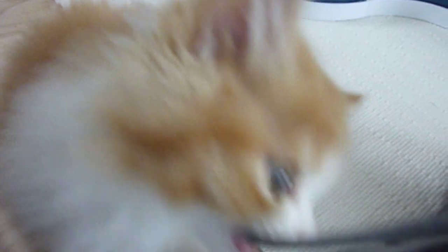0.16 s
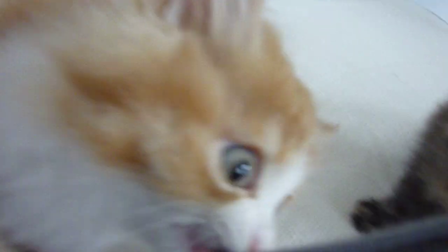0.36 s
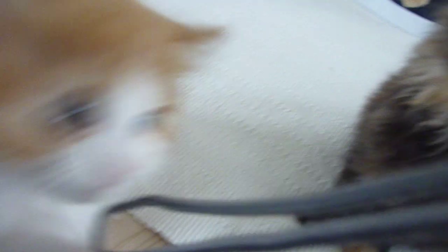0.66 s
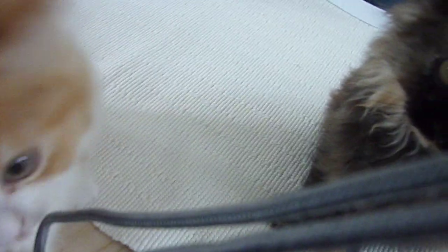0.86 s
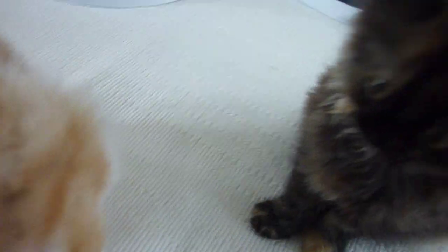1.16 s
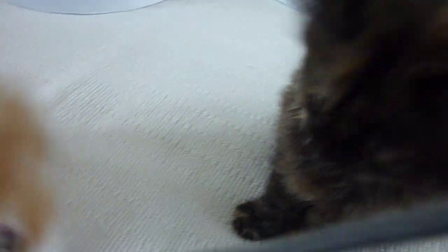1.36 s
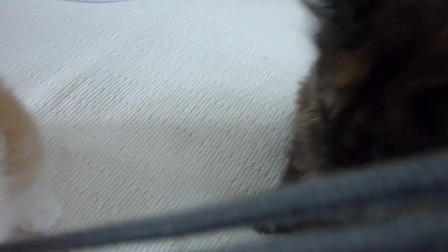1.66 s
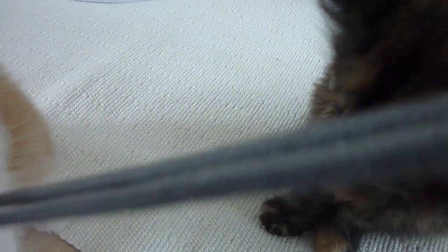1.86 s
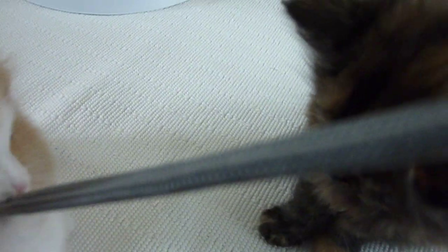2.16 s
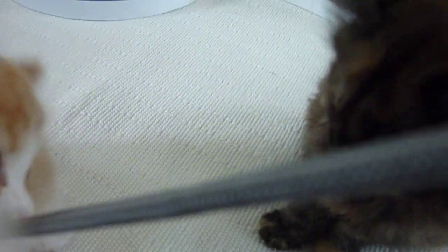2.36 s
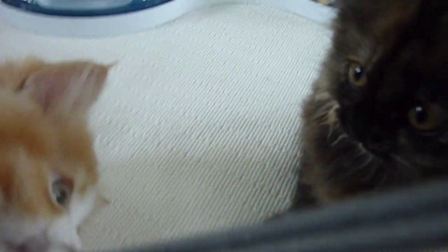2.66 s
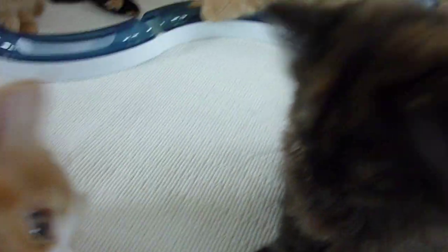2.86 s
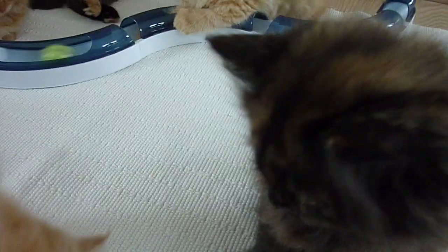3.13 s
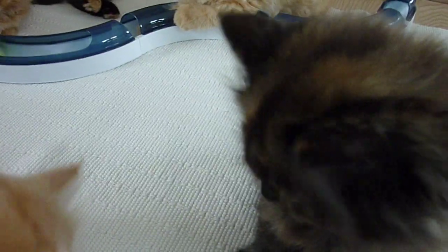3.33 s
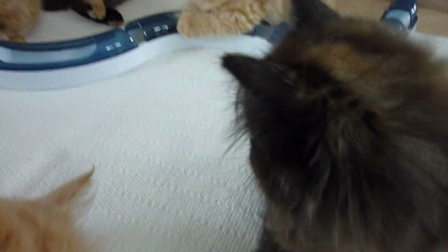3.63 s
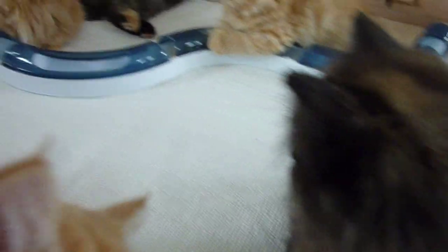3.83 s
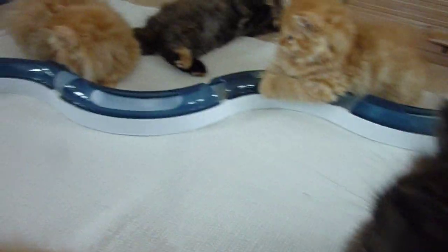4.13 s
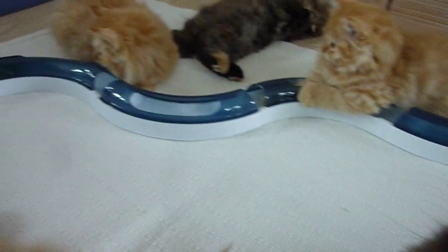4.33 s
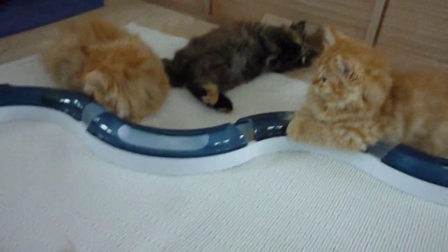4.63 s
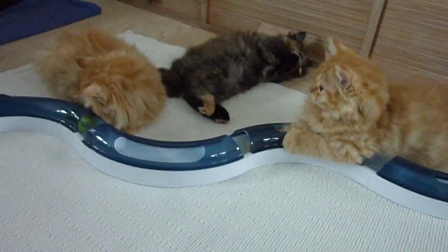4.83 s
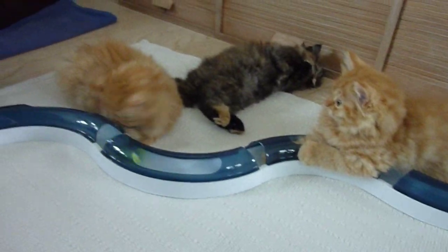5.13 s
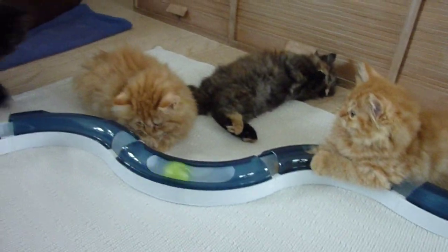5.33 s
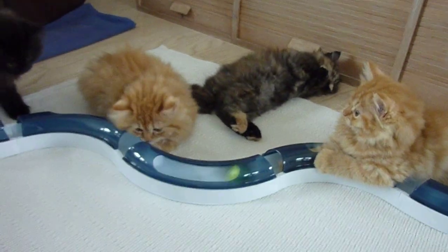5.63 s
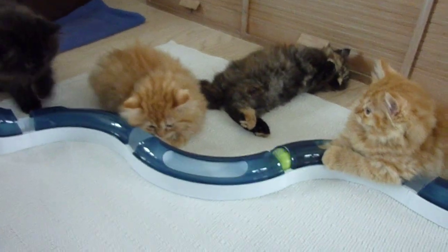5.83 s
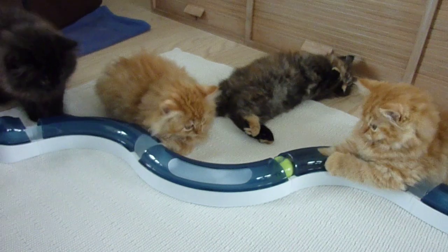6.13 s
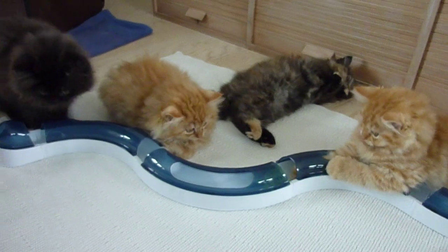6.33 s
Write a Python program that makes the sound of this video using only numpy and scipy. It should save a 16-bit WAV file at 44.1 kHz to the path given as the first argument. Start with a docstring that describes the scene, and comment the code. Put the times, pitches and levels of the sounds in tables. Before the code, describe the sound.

In a quiet room, a kitten swipes a ball along a plastic tube; it rattles over joints and fades after small strap snaps nearby.

```python
"""A ball, swiped by a kitten, rolls away down a hollow plastic track in a quiet room, clacking over the joints.
Struck and rubbed plastic is noise and impulses rung through the track's modes; paws tap, scuff and scrape.
Right at the microphone a camera strap, chewed and tugged by another kitten, clicks against the case and rubs.
Air noise, hiss and mains hum lie under it; the small camera cuts narrow notches and the top of the treble."""
import sys
import numpy as np
from scipy import signal
from scipy.fft import rfft, irfft, next_fast_len
from scipy.io import wavfile
from scipy.ndimage import uniform_filter1d, map_coordinates

SR = 44100
rng = np.random.default_rng(int(sys.argv[2]) if len(sys.argv) > 2 else 0)


def master(y):
    """Save y as 16-bit WAV."""
    cut = np.clip(np.atleast_2d(y).T, -1, 1)
    pcm = np.round(cut * 32767)  # scale
    wavfile.write(sys.argv[1], SR, pcm.astype(np.int16))


N = 286275

# how strongly the ball rolls on its way down the track: t/s, level/dB
ROLL_STRENGTH = [(2.78, -60), (2.94, -45.5), (3.12, -46.5), (3.23, -41.5), (3.52, -47.5), (3.9, -45.5),
                 (4.09, -49.5), (4.22, -46.5), (4.6, -52), (4.95, -54), (5.35, -51), (5.71, -54),
                 (5.9, -58)]
# rolling strength at which the parts of the rolling sound have their stated levels
FULL_ROLL_DB = -45.5
# spectrum of hard surfaces scraping, before scaling to rms 1: f/Hz, level/dB per Hz
SCRAPE_SPECTRUM = [(1500, -45), (3000, 1.5), (4000, 0), (5300, -6.5), (6500, -1.5), (7500, -3.5),
                   (9000, -11)]


def amp(db):
    """Decibels to gain."""
    return 10 ** (np.asarray(db) / 20)


def unit(x):
    """Scale to rms 1."""
    return x / np.sqrt(np.mean(x ** 2) + 1e-20)


def crest(x):
    """Scale so that the loudest 3 ms have rms 1."""
    power = uniform_filter1d(x ** 2, size=132, mode="constant")
    return x / np.sqrt(power.max() + 1e-20)


def along(points, hz):
    """Interpolate (Hz, value) points on a log frequency axis."""
    f, v = np.transpose(points)
    return np.interp(np.log(hz + 1), np.log(f), v)


def wobble(rate):
    """A smooth random curve with rate knots a second."""
    knots = rng.standard_normal(int(N * rate / SR) + 4)
    return map_coordinates(knots, [np.arange(N) * rate / SR])


def swell(peak_s, rise_s, fall_s):
    """Gain that climbs 20 dB in rise_s to its peak and drops 20 dB in each fall_s (for positive times)."""
    t = np.arange(N) / SR - peak_s
    return amp(-20 * np.maximum(-t / rise_s, t / fall_s))


def add(out, s, sound):
    """Mix a sound in at time s."""
    part = out[round(s * SR):][:len(sound)]
    part += sound[:len(part)]


def filtered(x, response):
    """Filter x by a complex response of frequency."""
    m = next_fast_len(len(x) + 4096)
    spectrum = rfft(x, m) * response(np.fft.rfftfreq(m, 1 / SR))
    return irfft(spectrum, m)[:len(x)]


def coloured(x, spectrum):
    """Shape x by the given spectrum and scale it to rms 1."""
    return unit(filtered(x, lambda f: amp(along(spectrum, f))))


def resonance(f, hz, width):
    """Causal response of one damped mode, of gain 1 at its centre."""
    return 1j * f * width / (hz * hz - f * f + 1j * f * width)


def soft(f, edge_hz):
    """A contact of finite length excites little above its edge: a low-pass."""
    return signal.freqs(*signal.butter(N=4, Wn=1, analog=True), f / edge_hz)[1]


def band(f, edges):
    """Causal band-pass that picks out one group of modes."""
    lo, hi = edges
    lowpass_f = (f * f - lo * hi) / ((f + 1) * (hi - lo))
    return signal.freqs(*signal.butter(N=2, Wn=1, analog=True), lowpass_f)[1]


def grains(rate, spread_db):
    """Tiny random contacts, rate a second on average, of either sign and uneven size."""
    struck = rng.random(N) < rate / SR
    sign = rng.choice([-1, 1], N)
    return struck * sign * amp(spread_db * np.clip(rng.standard_normal(N), -2, 2))


def blow(t, chatter, t60):
    """One impulse followed by dying chatter, whose size is relative to the impulse."""
    tail = rng.standard_normal(len(t)) * amp(-60 * t / t60) * (1 - np.exp(-t / 0.0024))
    return (t == 0) + chatter * tail / np.linalg.norm(tail)


def track(f, stretch=1):
    """Response of the hollow plastic tube: modes of alternating sign, all shifted by stretch."""
    # modes of the tube: f/Hz, width/Hz, level/dB
    tube_modes = [(186, 150, -8.5), (399, 125, -1), (660, 118, 2), (1023, 440, 0.5), (1362, 313, 3),
                  (1515, 194, 2.5), (2142, 440, -3)]
    response = 0
    for k, (hz, width, db) in enumerate(tube_modes):
        response = response + (-1) ** k * amp(db) * resonance(f, hz * stretch, width)
    return response


def tube(x, edges):
    """Ring x through one group of the track's modes."""
    return filtered(x, lambda f: track(f) * band(f, edges))


def knock(db, hz, octaves, tick_db, chatter, t60):
    """One contact on the tube: it drives a range of shifted modes about its pitch, with a bright tick on top."""
    stray_db = -15.5  # the modes far from the pitch are driven too, this weakly
    force = blow(np.arange(SR // 12) / SR, chatter, t60)
    stretch = np.exp(0.038 * rng.standard_normal())  # where it lands shifts the modes
    reach = 2 ** (max(octaves, .3) / 2)
    driven = lambda f: band(f, (hz / reach, hz * reach)) + amp(stray_db)
    wall = filtered(force, lambda f: track(f, stretch) * driven(f) * soft(f, edge_hz=3300))
    tick = filtered(force, lambda f: resonance(f, 4700, 3100) ** 2)
    return amp(db) * (crest(wall) + amp(tick_db) * crest(tick))


def squeaks(rate, reference_hz, t60):
    """Threads plucked by claws: each slip rings briefly at its own pitch, 0.66 to 1.1 times the reference."""
    count = int(rate * N / SR)
    place, pitch, size = rng.random((count, 3)).T[:, :, None]
    t = np.arange(SR // 40) / SR
    envelope = amp(10 * size - 60 * t / t60) * (1 - np.exp(-t / 0.00073))
    rings = envelope * np.sin(2 * np.pi * reference_hz * (0.66 + .44 * pitch) * t)
    where = (place * N).astype(int) + np.arange(len(t))
    return unit(np.bincount(where.ravel(), rings.ravel(), N)[:N])


def background():
    """Room air and microphone hiss are shaped noise; the mains hum is a sine whose level drifts slightly."""
    # spectrum of the room air, before scaling to rms 1: f/Hz, level/dB per Hz
    air_spectrum = [(25, -20), (40, -6), (60, -9.5), (85, -6), (140, -0.5), (210, 0.5), (300, -1.5),
                    (600, -5.5), (1100, -8.5), (1600, -12), (2300, -13), (3000, -27), (4000, -64.5)]
    # spectrum of the microphone's hiss, before scaling to rms 1: f/Hz, level/dB per Hz
    hiss_spectrum = [(1500, -41.5), (2600, -4.5), (3600, -0.5), (6000, 0), (7500, -3), (9000, -8.5)]
    air = amp(-53.0) * coloured(rng.standard_normal(N), air_spectrum)
    hiss = amp(-58.5) * coloured(rng.standard_normal(N), hiss_spectrum)
    mains = np.sin(2 * np.pi * 100.1 * np.arange(N) / SR)
    return air + hiss + amp(-57.5 + 0.44 * wobble(1.1)) * mains


def room(x):
    """The walls' answer: a late noise tail in which each frequency dies at its own speed."""
    # decay of the room: f/Hz, t60/s
    decay = [(200, 0.58), (1500, 0.39), (8000, 0.083)]
    hz, t, z = signal.stft(rng.standard_normal(SR // 2), SR, nperseg=256)
    dying = z * amp(-60 * t / along(decay, hz)[:, None])
    tail = signal.istft(dying, SR, nperseg=256)[1]
    delayed = np.pad(tail, (SR // 150, 0))  # the walls answer 1/150 s later
    return signal.fftconvolve(x, delayed / np.linalg.norm(tail))[:N]


def strap():
    """A snap is a sharp tick, then the case flexes and rings briefly; a soft rubbing of the strap dies away."""
    # snaps against the camera case: t/s, knock level/dB, flex f/Hz, tick level/dB (before a -1 dB trim)
    snaps = [(0.4426, -33, 1870, -41), (1.345, -32, 1040, -38), (1.4048, -45, 900, -44),
             (2.011, -40.5, 1030, -56), (2.5615, -32.5, 910, -40.5), (2.5655, -36.5, 860, -42),
             (2.672, -43.5, 600, -73)]
    # modes of the case: f/Hz, level/dB (before a random spread), t60/s
    case_modes = [(490, -6.5, 0.038), (768, -13.5, 0.065), (950, -11, 0.05), (1234, -5, 0.023),
                  (1780, -8, 0.021), (1980, -12.5, 0.044)]
    # rubbing as the kitten worries the strap: t/s, rise/s, fall/s, level/dB at t
    # (the rise is negative: the level falls slowly up to t, at the fall's rate, and faster from there on)
    fidget = (0.07, -1.5, 4.5, -59)
    out, t = np.zeros(N), np.arange(SR // 12) / SR
    for s, db, hz, tick_db in snaps:
        flex = np.sin(2 * np.pi * hz * t) * amp(-60 * t / 0.0085)
        ring = 0
        for f, level, t60 in case_modes:
            drive = abs(resonance(f, hz, 820))  # modes near the flex frequency are driven most
            decay = amp(level + 2 * rng.standard_normal() - 60 * t / t60)
            ring = ring + drive * decay * np.sin(2 * np.pi * f * t)
        tick = filtered(blow(t, chatter=0.65, t60=0.0085), lambda f: resonance(f, 6680, 3500) ** 2)
        body = filtered(flex + ring, lambda f: band(f, (330, 2800)))
        add(out, s, amp(tick_db - 1) * crest(tick))
        add(out, s + 0.00034, amp(db) * crest(body))
    rubs = grains(rate=380, spread_db=8.5)
    rubbing = unit(filtered(rubs, lambda f: resonance(f, 1000, 1000) * soft(f, edge_hz=2000)))
    peak_s, rise_s, fall_s, rub_db = fidget
    return out + amp(rub_db) * swell(peak_s, rise_s, fall_s) * rubbing


def claws():
    """A sharp point catches and slips in a very short bright burst that leaves a faint ring."""
    # ticks of claws and teeth: t/s, level/dB (before an -11 dB trim), f/Hz, ring t60/s
    catches = [(0.173, -39.5, 6260, .05), (0.441, -31, 6500, .02), (0.489, -30.5, 3750, .02),
               (2.809, -24, 6900, .01), (2.898, -25, 4340, .02), (2.91, -36, 5250, 0.083),
               (2.935, -23, 6260, 0.075), (3.399, -37.5, 5650, 0.029), (6.101, -30, 6000, 0.16),
               (6.433, -38.5, 6530, .03)]
    out, t = np.zeros(N), np.arange(SR // 6) / SR
    for s, db, hz, t60 in catches:
        burst = filtered(blow(t, chatter=3.3, t60=0.0075), lambda f: resonance(f, hz, 0.46 * hz) ** 2)
        ring = np.sin(2 * np.pi * hz * t) * amp(-60 * t / t60)
        add(out, s, amp(db - 11.0) * (crest(burst) + amp(-6.5) * ring))
    return out


def paws():
    """Each stroke swells and fades: the pad presses, then fur and claws drag over plastic and weave in small slips."""
    # paw strokes: peak t/s, rise/s, fall/s, then level/dB of pad thud, scuff and scrape (before the mix below)
    strokes = [(0.452, 0.017, 0.035, -63, -47.5, -56), (0.473, 0.014, 0.048, -52, -43, -46.5),
               (1.412, .014, 0.028, -56, -64, -46.5), (2.755, 0.0062, 0.053, -56, -46.5, -53),
               (2.81, 0.045, 0.1, -43, -43, -47.5), (2.915, 0.018, 0.078, -54, -52, -43.5),
               (2.995, 0.12, 0.12, -53, -40.5, -49.5), (4.0, 0.034, 0.085, -51, -46.5, -58),
               (4.132, 0.05, 0.038, -61, -40.5, -54), (4.161, 0.029, 0.057, -58, -38, -47.5),
               (6.104, 0.05, 0.083, -39, -47, -43)]
    # spectrum of the scuff, before scaling to rms 1: f/Hz, level/dB per Hz
    scuff_spectrum = [(100, -25), (400, -13), (1000, -9.5), (1400, 0), (1750, 3), (2100, -3), (2500, -3.5),
                      (3400, -51), (6000, -23.5)]
    pad_lead_s = 0.025  # the pad lands before fur and claws drag
    pad_gain, scuff_gain, scrape_gain = np.zeros((3, N))
    for s, rise_s, fall_s, pad_db, scuff_db, scrape_db in strokes:
        stroke = swell(s, rise_s, fall_s)
        pad_gain += amp(pad_db) * swell(s - pad_lead_s, rise_s, fall_s)
        scuff_gain += amp(scuff_db) * stroke
        scrape_gain += amp(scrape_db) * stroke
    thud = unit(filtered(grains(rate=2000, spread_db=2.0), lambda f: band(f, (400, 950))))
    scuff = coloured(grains(rate=4400, spread_db=1.0), scuff_spectrum)
    scrape = amp(-1.0) * coloured(grains(rate=12000, spread_db=3.5), SCRAPE_SPECTRUM)
    scrape = scrape + amp(-4.0) * squeaks(rate=270, reference_hz=6290, t60=0.017)
    return amp(-6.0) * pad_gain * thud + amp(-1.0) * scuff_gain * scuff + scrape_gain * scrape


def taps():
    """Paws bat the track: the claws give each tap a clear tick, the pad a dull thump."""
    # paw taps: t/s, level/dB (before the trim below), f/Hz, range of modes/octaves
    tap_list = [(0.597, -47, 2080, 0.75), (0.775, -48.5, 1410.0, 3.5), (0.854, -43, 1770.0, 2.5),
                (0.874, -40, 750.0, 5.3), (1.131, -41, 450.0, 2.2), (1.155, -41, 1020, 0.5),
                (1.377, -41.5, 1490.0, 1.3), (1.382, -45.5, 1580.0, 2), (1.794, -43, 480.0, 3.25),
                (1.884, -46, 840.0, 3.5), (2.396, -45, 480.0, 3.2), (2.792, -38, 2100.0, 0.51),
                (2.803, -32.5, 450.0, 2.9), (2.816, -36.5, 1000.0, 0.5), (2.829, -35.5, 2100.0, 1.2),
                (2.86, -40, 450.0, 1.4), (2.898, -30, 2100.0, 0.89), (2.966, -38, 1120.0, 1),
                (2.984, -28.5, 880, 5.2), (3.005, -33, 2100.0, 4.5), (3.02, -34, 1170, 0.46),
                (3.034, -36, 646, 0.82), (3.078, -35.5, 880, 0.75), (3.1, -39.5, 510, 1.3),
                (4.132, -40, 835, 2.3), (6.245, -47, 1330.0, 1.25)]
    out, t = np.zeros(N), np.arange(SR // 12) / SR
    for s, db, hz, octaves in tap_list:
        add(out, s, knock(db, hz, octaves, tick_db=-15, chatter=0.76, t60=0.03))
        thump = filtered(blow(t, chatter=0.64, t60=0.069), lambda f: band(f, (135, 300)))
        add(out, s, amp(db - 13) * crest(thump))
    return amp(-0.47) * out


def ball():
    """The ball bumps over small flaws in the tube, brighter the stronger it rolls, with a short drifting echo."""
    low, middle, upper = (136, 970), (825, 1480), (1200, 2550)  # groups of the track's modes, Hz
    n = np.arange(N)
    strength_db = np.interp(n / SR, *np.transpose(ROLL_STRENGTH), left=-120, right=-120)
    pace = amp(strength_db - FULL_ROLL_DB)
    bumps = grains(rate=380, spread_db=3) * amp(1.0 * wobble(49))
    # echo from the tube's end, about 7 ms late; its delay drifts at random
    echo_delay_s = .007 + 0.00097 * wobble(1.5)
    bumps = bumps + 0.32 * np.interp(n - SR * echo_delay_s, n, bumps)
    # higher parts grow faster with the pace
    low_part = amp(-45.0) * pace ** 0.96 * unit(tube(bumps, low))
    middle_part = amp(-47.0) * pace ** 1.35 * unit(tube(bumps, middle))
    fizz = coloured(grains(rate=1900, spread_db=0.5), SCRAPE_SPECTRUM)
    bright_part = pace ** 1.45 * (amp(-52.0) * unit(tube(bumps, upper)) + amp(-64.5) * fizz)
    return low_part + middle_part + bright_part


def joints():
    """The ball hits a joint or the wall and rebounds once; the weaker it rolls, the duller the ticks."""
    # clacks: t/s, level/dB (before the trim below), f/Hz, range of modes/octaves,
    # rebound delay/s, rebound level/dB relative to the clack
    clacks = [(3.188, -30.5, 890.0, 4.8, 0.006, 5.5), (3.196, -29, 1070, 0.41, 0.01, -2.5),
              (3.249, -32.5, 1060.0, 0.75, 0.006, 0.5), (3.26, -29.5, 800.0, 3.3, 0.004, 0.5),
              (3.323, -28, 450.0, 4.2, 0.005, -10), (3.412, -25.5, 960, 5.5, 0.008, -9),
              (3.452, -27.5, 800.0, 4.9, 0.013, -6), (3.458, -27, 850, 3.2, 0.0048, -8),
              (3.513, -35, 450.0, 5.2, 0.004, -2), (3.62, -32, 535, 3.8, 0.0061, 2),
              (3.651, -36, 1350, 0.41, 0.004, -10), (3.664, -29.5, 530.0, 2.9, 0.0051, -3.5),
              (3.742, -34, 450.0, 4, 0.0095, -1.5), (3.855, -32.5, 595, 4, 0.0061, -6.5),
              (3.884, -32.5, 1580.0, 1.6, 0.0048, -12), (3.976, -31.5, 1720, 0.38, 0.0039, 2.5),
              (3.992, -31, 840.0, 4.5, 0.006, -22), (3.997, -34.5, 450.0, 3.2, 0.0038, -10),
              (4.25, -35.5, 750.0, 3, 0.0053, -4), (4.299, -36, 2100.0, 2.6, 0.0034, -14),
              (4.324, -43, 450.0, 2.5, 0.004, -8), (4.4, -44, 940.0, 4.6, 0.006, 3.5),
              (4.445, -38, 1410.0, 1.4, 0.0043, -8), (4.468, -35.5, 1370, 1.5, 0.0046, -1),
              (4.62, -34, 670.0, 1.7, 0.005, -17), (4.793, -36.5, 450.0, 3.3, 0.016, -5),
              (4.955, -34, 570.0, 4, 0.008, -8), (4.993, -34.5, 890.0, 4.8, 0.0054, -11),
              (5.006, -36.5, 1980.0, 1.5, 0.012, -12), (5.122, -34.5, 450.0, 4.4, 0.0055, 0.5),
              (5.301, -32, 1090, 0.74, 0.0075, -13), (5.472, -34.5, 450.0, 3.5, 0.0039, -10),
              (5.656, -38, 750.0, 3.2, 0.0037, 4), (5.813, -37.5, 450.0, 3.7, 0.004, -20),
              (5.825, -31.5, 500.0, 4.7, 0.014, -3.5)]
    out = np.zeros(N)
    for s, db, hz, octaves, rebound_s, rebound_db in clacks:
        strength_db = np.interp(s, *np.transpose(ROLL_STRENGTH))
        tick_db = -18.5 + .5 * (strength_db - FULL_ROLL_DB)
        add(out, s, knock(db, hz, octaves, tick_db, chatter=0.88, t60=0.028))
        rebound = knock(db + rebound_db, hz, octaves, tick_db, chatter=0.53, t60=0.047)
        add(out, s + rebound_s, rebound)
    return amp(-2.92) * out


def scene():
    """The toy lies out in the room and wakes its walls; the strap is right at the microphone and stays dry."""
    toy = taps() + joints() + ball() + paws() + claws()
    return (toy + amp(-12.5) * room(toy) + strap() + background())[None]


def record(dry):
    """The camera cuts three narrow notches, keeps nothing above its band limit and sits at a constant offset."""
    # response of the camera's microphone: f/Hz, level/dB
    microphone = [(70, -0.5), (6800, -1), (7500, -4), (8300, -12.5), (8800, -22), (9100, -43)]
    # the camera's notch filters: f/Hz, width/Hz
    notch_bands = [(3000, 580), (4400, 960), (8000, 170)]
    top_hz, offset = 9050, -.0356  # band limit in Hz, offset as a fraction of full scale
    notches = lambda f: np.prod([1 - resonance(f, hz, width) for hz, width in notch_bands], axis=0)
    camera = lambda f: notches(f) * amp(along(microphone, f)) * (f < top_hz)
    return offset + filtered(dry[0], camera)[None]


dry = scene()
out = record(dry)
master(out)
```